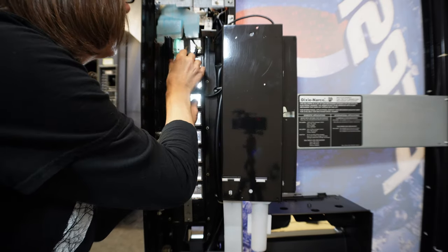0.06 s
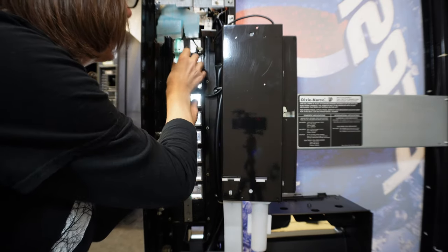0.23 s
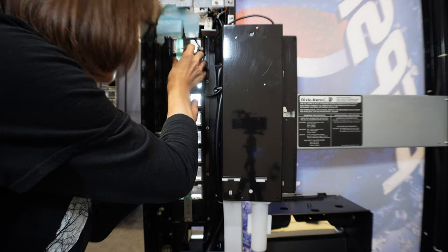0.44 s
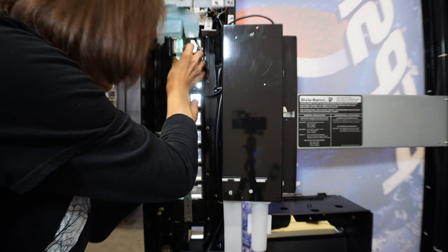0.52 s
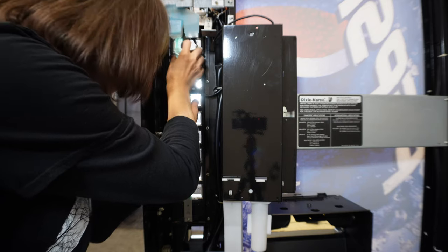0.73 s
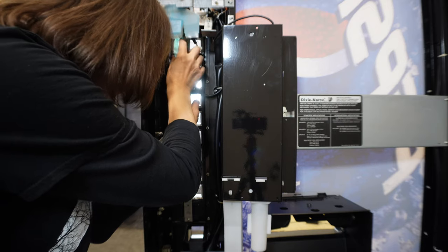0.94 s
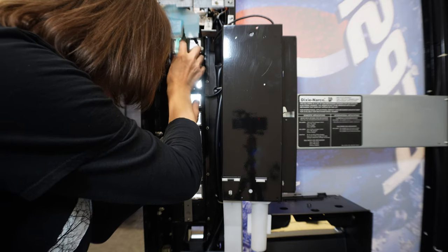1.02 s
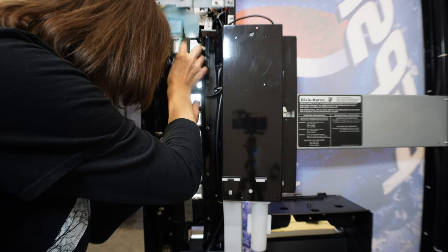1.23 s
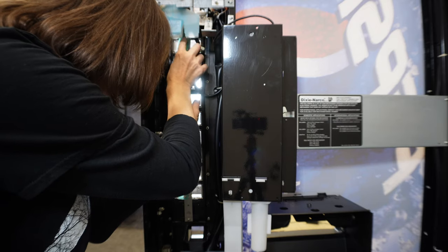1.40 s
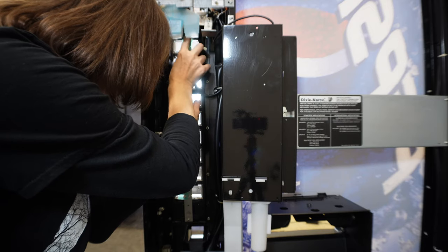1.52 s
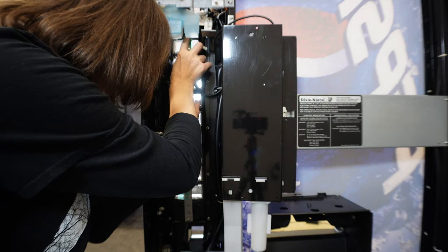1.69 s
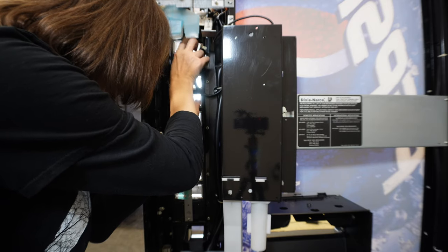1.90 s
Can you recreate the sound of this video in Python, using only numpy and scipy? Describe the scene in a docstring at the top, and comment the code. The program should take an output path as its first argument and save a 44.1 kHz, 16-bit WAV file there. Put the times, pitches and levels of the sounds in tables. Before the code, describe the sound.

Sharp mechanical clicks and clacks of parts handled inside a vending machine, over faint hum.

```python
"""A hand works on the parts inside an open vending machine. After a few light touches a plastic catch
snaps; then a lever clacks twice against the sheet-metal frame and rattles, each impact exciting damped
modes. Light bumps, ticks and stick-slip scrapes of small parts follow, and near the end the catch knocks
softly before a last scrape. Along the way a springy part pings, the cabinet booms faintly when pushed
and the room reverberates after the loud blows. The machine hums softly throughout."""
import sys
import numpy as np
from scipy import signal
from scipy.fft import rfft, irfft
from scipy.io import wavfile
from scipy.ndimage import uniform_filter1d

SR = 44100
rng = np.random.default_rng(int(sys.argv[2]) if len(sys.argv) > 2 else 0)


def master_out(mix):
    """Clip the mix to full scale and print it as 16-bit PCM to the path in sys.argv[1]."""
    frames = np.transpose(np.atleast_2d(mix))
    ceiling = np.clip(frames, -1, 1)
    pcm = np.round(ceiling * 32767).astype(np.int16)
    wavfile.write(sys.argv[1], SR, pcm)


N = 85995

# Modes of a small part: f/Hz, relative level/dB, T60/s
SMALL_PART_MODES = [(3852, -4, 0.011), (4463, -1.2, 0.014), (4830, -2.5, 0.015)]
# Spectra of dense, short-lived vibration (panel thud, bright crack, high fizz): f/Hz, gain/dB
PANEL_THUD_SPECTRUM = [(100, -24), (300, -4.5), (550, -2.5), (1000, 1), (1800, -5), (2400, -14),
                       (4000, -12.5), (9000, -42)]
CRACK_SPECTRUM = [(300, -39), (1400, -16), (2400, -1.5), (3500, 0.5), (4400, 0.5), (5600, -1),
                  (7200, -11.5), (10000, -28), (16000, -32)]
FIZZ_SPECTRUM = [(1000, -54), (5000, -12.5), (7000, -1.5), (9000, 4.5), (11000, -1.5), (15500, -8.5)]


def lever():
    """Impact and rebound: the lever strikes the sheet-metal frame and rattles, ringing long modes."""
    # t/s, ring level/dB, thud level/dB, crack level/dB, fizz level/dB, low-pass f/Hz
    clacks = [(0.2983, -20.5, 19.5, -2.5, -22, 9500), (0.3092, -29, 12.5, -0.5, -16.5, 8950),
              (0.3190, -30.5, 11, -20, -36, 3900), (0.3485, -26.5, 10.5, -19, -45, 2150),
              (0.3840, -40, 0, -16, -32, 2010), (0.4505, -19, 17.5, 1.5, -15, 9000),
              (0.4620, -20, 17.5, 0, -18.5, 8900), (0.5821, -45, 1, -16.5, -34, 1280)]
    modes = [(381.5, -23, 0.67), (644.3, -17.5, 0.65), (910.5, -3, 0.13), (986, -7, 0.25),
             (1056, -17, 0.31), (1120, -8, 0.18), (1584, -1.5, 0.062), (1700, -16.5, 0.57),
             (1853.7, -11, 0.18), (2316, -6.5, 0.1), (3636, -12.5, 0.046), (4362, -17, 0.051),
             (5185, -12, 0.041), (5520, -15, 0.041)]  # f/Hz, relative level/dB, T60/s
    thud_spectrum = [(50, -67), (120, -29), (220, -17), (350, -5.5), (650, -4.5), (950, 5), (1300, -6),
                     (1750, 1.5), (2300, -12), (4000, -21), (9000, -46)]  # f/Hz, gain/dB
    return impacts(clacks, modes, thud_spectrum)


def catch():
    """Impulse excitation: the plastic catch snaps, and most of its modes are quickly damped."""
    # t/s, ring level/dB, thud level/dB, crack level/dB, fizz level/dB, low-pass f/Hz
    snaps = [(0.2222, -13, 9.5, 3, -14.5, 9000), (0.7845, -45, -11.5, -17, -29.5, 5000),
             (1.5985, -42, -4, -29.5, -43, 1230), (1.6305, -41, -4, -31, -51, 1200),
             (1.6832, -28.5, 5, -25, -52, 1950)]
    modes = [(1086.4, -0.5, 0.072), (1274, -17, 0.037), (1464, 2, 0.039), (2080, -29, 0.45),
             (2750, -33, 0.034), (3470, -12, 0.026), (5415, -14, 0.029)]  # f/Hz, relative level/dB, T60/s
    thud_spectrum = [(100, -30), (220, -7.5), (350, 1), (600, 0.5), (850, -6.5), (1300, 7), (1650, 1),
                     (2200, -17.5), (4000, -54), (9000, -70)]  # f/Hz, gain/dB
    return impacts(snaps, modes, thud_spectrum)


def panel():
    """Soft contact: light bumps excite mainly the panel's low vibration."""
    # t/s, ring level/dB, thud level/dB, crack level/dB, fizz level/dB, low-pass f/Hz
    bumps = [(0.0225, -54, -10.5, -25.5, -41, 3050), (0.1230, -54, -9, -24, -52, 1010),
             (1.0190, -56, -9.5, -29, -46, 1260), (1.0625, -54, -10.5, -26.5, -41, 1530),
             (1.1716, -41.5, 0, -17, -31.5, 1040), (1.1860, -71, -7, -25.5, -32, 1010),
             (1.2975, -40, -9, -37, -49, 2870), (1.5460, -52.5, -21, -35, -54, 1720)]
    modes = [(558, -3, 0.19), (746, -25, 0.23), (978, -5.5, 0.11), (1186, -1.5, 0.087), (1526, 4.5, 0.044),
             (2014, 0, 0.051)]  # f/Hz, relative level/dB, T60/s
    return impacts(bumps, modes, PANEL_THUD_SPECTRUM)


def small_parts():
    """Small bodies have high natural frequencies: they tick over a thud of the panel."""
    # t/s, ring level/dB, thud level/dB, crack level/dB, fizz level/dB, low-pass f/Hz
    ticks = [(0.0478, -71, -18, -24.5, -34.5, 9000), (0.5307, -57, -16, -19, -28.5, 9000),
             (0.9418, -35, -15.5, -23, -31.5, 8900), (1.0061, -43, -17, -25, -43, 9000),
             (1.0430, -58, -24, -30, -37.5, 9000), (1.2446, -70, -20.5, -23.5, -37.5, 9000),
             (1.5618, -66, -26, -40, -39.5, 8600), (1.6796, -55, -4.5, -43, -34.5, 9000),
             (1.7474, -56, -19, -26, -38, 9100)]
    return impacts(ticks, SMALL_PART_MODES, PANEL_THUD_SPECTRUM)


def impacts(blows, modes, thud_spectrum):
    """Superposition: each blow sums the part's ring, crack and fizz with a thud of its mounting."""
    out = np.zeros(N)
    # The ringing carries little energy below this corner.
    radiation = signal.butter(2, 306, "high", fs=SR, output="sos")
    tone = signal.sosfilt(radiation, ring(modes))
    crack = colour(burst(rise_s=0.0004, t60_s=0.051), CRACK_SPECTRUM)
    fizz = colour(burst(rise_s=0.0004, t60_s=0.035), FIZZ_SPECTRUM)
    for onset, ring_db, thud_db, crack_db, fizz_db, dull_hz in blows:
        thud = colour(burst(rise_s=0.00092, t60_s=0.0492, flatten_passes=3), thud_spectrum)
        body = amp(ring_db) * tone + amp(thud_db) * thud
        soft_contact = signal.butter(4, dull_hz, fs=SR, output="sos")
        add(out, onset, signal.sosfilt(soft_contact, body))
        add(out, onset, amp(crack_db) * crack + amp(fizz_db) * fizz)
    return out


def ring(modes, rise_s=0.00047, size=16384):
    """Free vibration: each distinct mode is an exponentially damped sinusoid."""
    t = np.arange(size) / SR
    tones = sum(amp(db - 60 * t / t60) * np.sin(2 * np.pi * hz * t) for hz, db, t60 in modes)
    return tones * (1 - np.exp(-t / rise_s))


def burst(rise_s, t60_s, flatten_passes=0, chatter_s=0.0019, size=16384):
    """Modal overlap: countless modes merge into noise that holds while the contact chatters, then dies."""
    t = np.arange(size) / SR
    envelope = (1 - np.exp(-t / rise_s)) * amp(-60 * np.maximum(t - chatter_s, 0) / t60_s)
    noise = rng.standard_normal(size) * envelope
    for _ in range(flatten_passes):  # level the spectrum, then restore the envelope
        spectrum = rfft(noise)
        white = irfft(spectrum / (abs(spectrum) + 1e-12))
        local_rms = np.sqrt(abs(uniform_filter1d(white ** 2, size=128)) + 1e-14)
        noise = envelope * white / local_rms
    return unit(noise)


def scrapes(slips_per_s=5000, ring_db=-22.5):
    """Stick-slip friction: a run of tiny slips swells and dies, shaking a small part and the panel."""
    # peak t/s, rise constant/s, fall constant/s, thud level/dB, crack level/dB, fizz level/dB
    slides = [(0.019, 0.014, 0.0045, -9, -24, -43), (0.09, .009, 0.0066, -13.5, -13.5, -25.5),
              (0.188, 0.0065, 0.011, -15, -21, -31), (0.653, 0.0087, 0.0069, -9, -5, -23.5),
              (0.74, 0.0066, 0.011, -18, -20, -42), (0.93, 0.0056, 0.0034, -13, -36, -49),
              (1.301, 0.004, 0.016, -1, -31, -50), (1.495, 0.028, 0.022, -48, -22, -37),
              (1.788, 0.0034, 0.0066, -0.5, 2, -16.5)]
    t, out, tone = np.arange(N) / SR, np.zeros(N), ring(SMALL_PART_MODES)
    for peak, rise, fall, thud_db, crack_db, fizz_db in slides:
        envelope = np.exp(-np.maximum((peak - t) / rise, (t - peak) / fall))
        slips = rng.standard_normal(N) * (rng.random(N) < slips_per_s / SR)
        force = unit(slips * envelope)
        rasp = colour(force, CRACK_SPECTRUM) + amp(ring_db) * signal.fftconvolve(force, tone)[:N]
        out += amp(thud_db) * colour(force, PANEL_THUD_SPECTRUM)
        out += amp(crack_db) * rasp / 2
        out += amp(fizz_db) * colour(force, FIZZ_SPECTRUM)
    return out


def spring(lower_ratio=0.925, lower_db=0.5, t60_s=0.036):
    """Beating modes: a small springy part pings with a close pair of short, high tones."""
    pings = [(0.1232, -52, 3810), (0.3842, -40.5, 3530), (0.5823, -40.5, 3440), (1.5995, -56, 3460),
             (1.6313, -54.5, 3300), (1.6798, -48.5, 4830)]  # t/s, level/dB, upper mode f/Hz
    out = np.zeros(N)
    for onset, db, hz in pings:
        modes = [(hz, 0, t60_s), (hz * lower_ratio, lower_db, t60_s)]
        add(out, onset, amp(db) * ring(modes))
    return out


def room(direct, frame=256):
    """Reverberation: a diffuse field decays at its own rate in each band, the bass lasting longest."""
    decay_times = [(150, 1.8), (400, 0.43), (1000, 0.8), (1800, 0.51), (5000, 0.46), (12000, 0.8)]  # f/Hz, T60/s
    tail_levels = [(150, 0.5), (400, -0.5), (1000, -10.5), (1800, -7.5), (2600, -9), (5000, -16),
                   (12000, -11.5)]  # f/Hz, level/dB relative to the direct sound
    diffuse = burst(rise_s=0.004, t60_s=100, flatten_passes=3, size=65536)  # almost steady noise
    hz, t, bands = signal.stft(diffuse, SR, nperseg=frame)
    decay = amp(-60 * t / read(decay_times, hz)[:, None])
    decay_rms = np.sqrt(np.mean(decay ** 2, axis=1, keepdims=True))
    decay *= amp(read(tail_levels, hz))[:, None] / decay_rms
    response = signal.istft(bands * decay, SR, nperseg=frame)[1]
    return signal.fftconvolve(direct, response)[:N]


def cabinet(resonance_hz=112, width_hz=15, swell_s=0.035):
    """Resonance: the cabinet's lowest mode booms briefly under a push, as a narrow band of noise."""
    pushes = [(0.495, -54), (1.72, -60), (1.80, -50)]  # peak t/s, rms level/dB
    t, hz = np.arange(N) / SR, np.fft.rfftfreq(N, 1 / SR)
    shake = shaped_noise(np.exp(-((hz - resonance_hz) / width_hz) ** 2))
    swells = sum(amp(db) * np.exp(-((t - peak) / swell_s) ** 2) for peak, db in pushes)
    return shake * swells


def machine(fan_db=-56, waver_depth=0.18, waver_hz=5):
    """Line spectrum over a continuum: hum tones waver in amplitude and phase above steady fan noise."""
    hum_lines = [(111, -66), (120, -77), (240, -57), (360.5, -67), (556, -69.5)]  # f/Hz, rms level/dB
    fan_spectrum = [(25, -31), (50, -24), (90, -4.5), (180, -8), (260, -6), (420, -10.5), (580, -9),
                    (760, -23), (900, -11.5), (1200, -25.5), (1700, -20), (2800, -29.5), (4500, -29.5),
                    (6400, -32), (15500, -35)]  # f/Hz, relative spectral level/dB
    t, hz = np.arange(N) / SR, np.fft.rfftfreq(N, 1 / SR)
    out = amp(fan_db) * shaped_noise(amp(read(fan_spectrum, hz)))
    slow_band = np.exp(-(hz / waver_hz) ** 2)
    for line_hz, db in hum_lines:
        swell = 1 + waver_depth * shaped_noise(slow_band)
        phase = waver_depth * shaped_noise(slow_band)
        out += np.sqrt(2) * amp(db) * swell * np.sin(2 * np.pi * line_hz * t + phase)
    return out


def shaped_noise(gains):
    """Spectral weighting: white noise takes one gain per frequency and is scaled to an rms of one."""
    return np.sqrt(N) * unit(irfft(rfft(rng.standard_normal(N)) * gains, N))


def colour(x, spectrum, size=4096):
    """Minimum-phase filtering: imposes a spectrum causally, so nothing precedes an attack."""
    hz = abs(np.fft.fftfreq(size, 1 / SR))
    log_gain = np.log(amp(read(spectrum, hz)))
    taps = np.fft.ifft(np.exp(np.conj(signal.hilbert(log_gain)))).real
    return signal.fftconvolve(x, taps[:size // 2])[:len(x)]


def amp(db):
    """Decibel law: level to amplitude ratio."""
    return 10 ** (np.asarray(db) / 20)


def unit(x):
    """Normalisation to an energy of one."""
    return x / np.sqrt(np.sum(x ** 2) + 1e-20)


def read(points, hz):
    """Interpolation on a log-frequency axis."""
    f, value = np.transpose(points)
    return np.interp(np.log(hz + 1), np.log(f + 1), value)


def add(mix, onset_s, sound):
    """Superposition of a delayed sound on the mix."""
    part = mix[max(round(onset_s * SR), 0):][:len(sound)]
    part += sound[:len(part)]


def scene():
    """Direct and reverberant fields of the handled parts add to the cabinet's booms and the hum."""
    parts = catch() + lever() + panel() + small_parts() + spring() + scrapes()
    return (parts + room(parts) + cabinet() + machine())[None]


def record(dry, cutoff_hz=15850):
    """Band limiting: a linear-phase low-pass removes the highest treble."""
    low_pass = signal.firwin(511, cutoff_hz, window=("kaiser", 9), fs=SR)
    return signal.oaconvolve(dry, low_pass[None], "same")


dry = scene()
out = record(dry)
master_out(out)
```